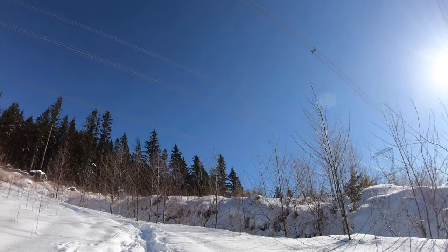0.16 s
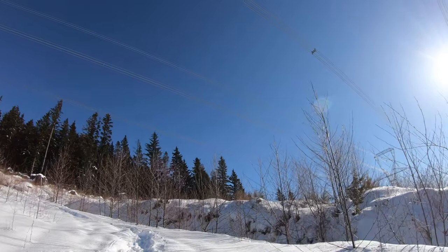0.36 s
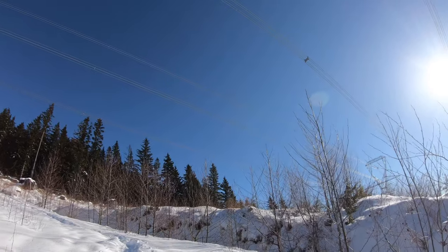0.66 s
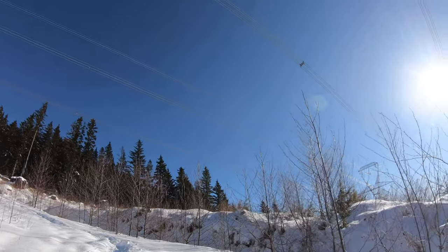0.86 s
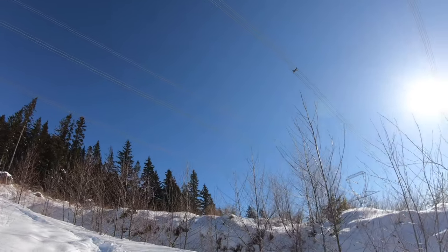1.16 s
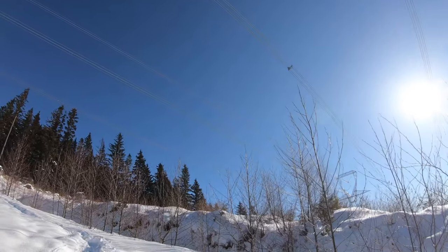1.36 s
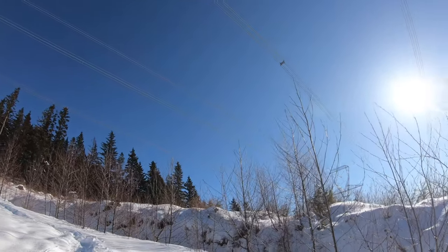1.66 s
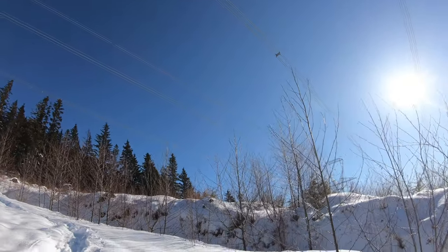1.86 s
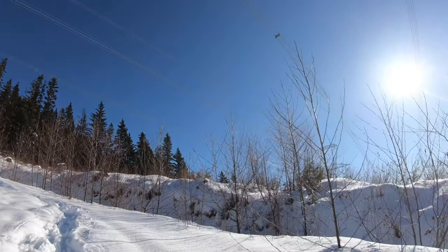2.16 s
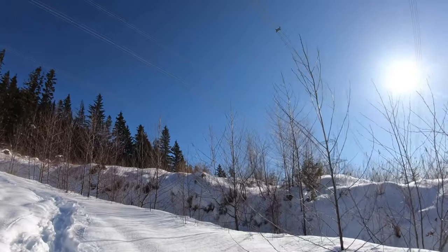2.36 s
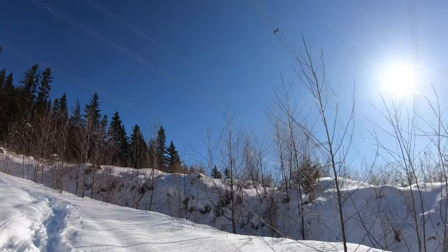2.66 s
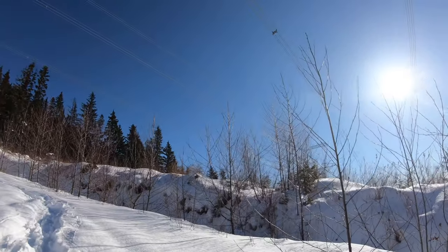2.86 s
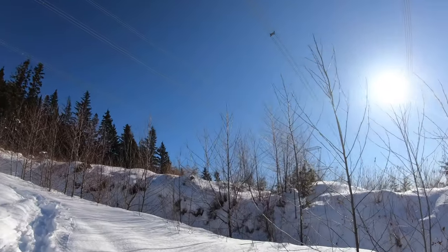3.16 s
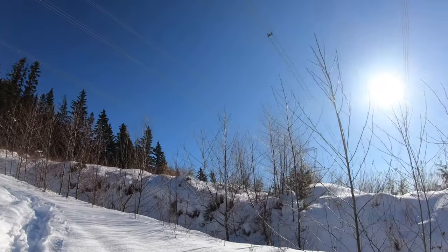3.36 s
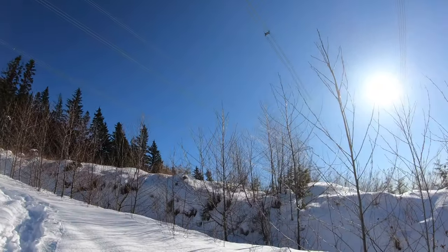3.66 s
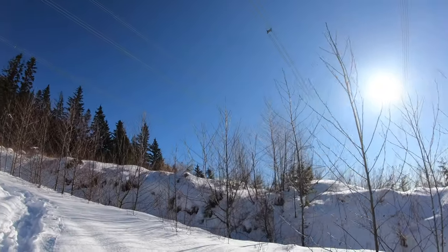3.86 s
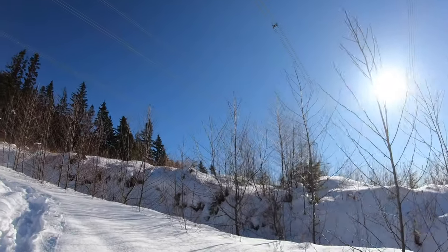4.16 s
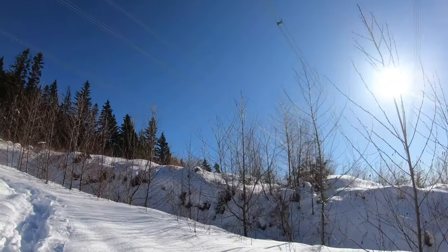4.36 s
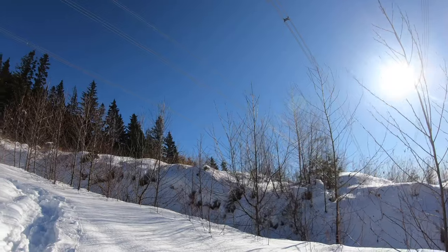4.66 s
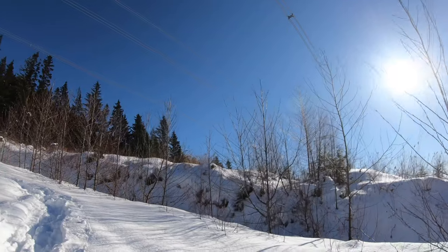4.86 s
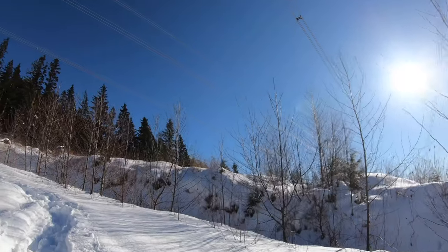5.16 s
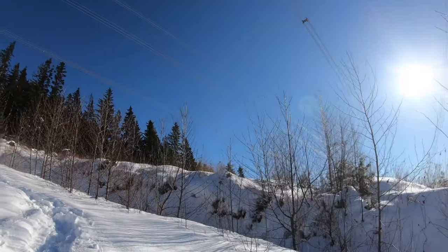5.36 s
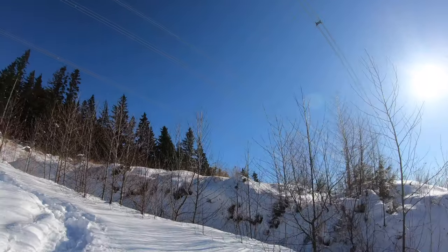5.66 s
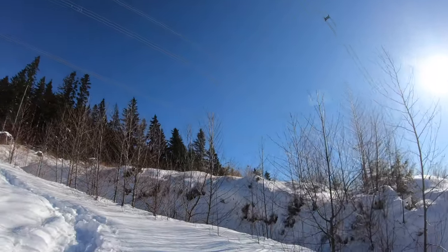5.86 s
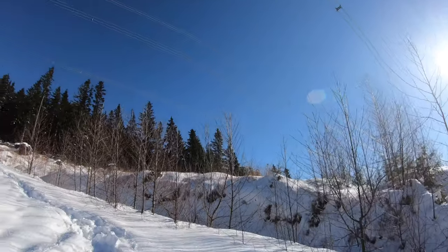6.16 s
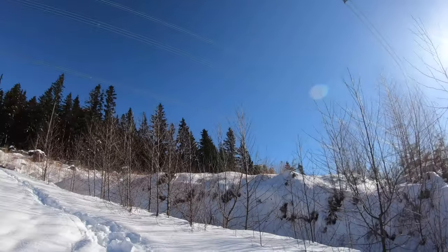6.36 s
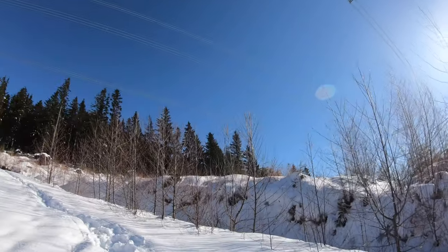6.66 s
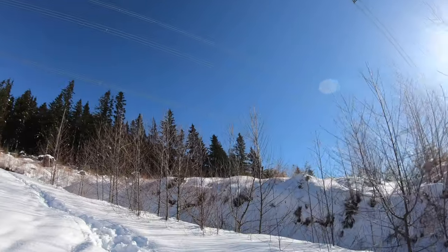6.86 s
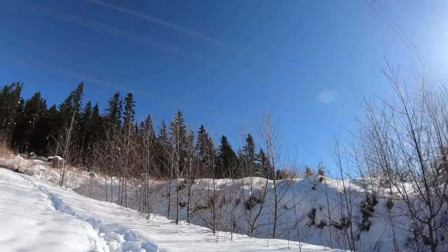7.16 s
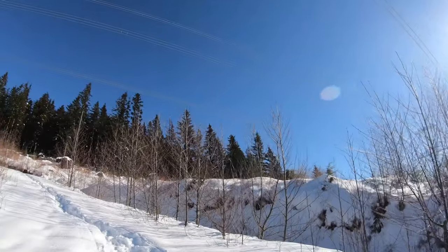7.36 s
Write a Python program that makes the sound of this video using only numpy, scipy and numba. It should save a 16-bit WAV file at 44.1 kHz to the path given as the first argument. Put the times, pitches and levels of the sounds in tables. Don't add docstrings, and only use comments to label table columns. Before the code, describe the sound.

Close walking footsteps break snow crust with crisp crackling and icy ticks, over faint airy hiss and occasional low wind buffets.

```python
import sys
import numpy as np
from scipy import signal
from scipy.fft import rfft, irfft, next_fast_len
from scipy.io import wavfile
from scipy.ndimage import uniform_filter1d, minimum_filter1d, map_coordinates
from numba import njit

SR = 44100
rng = np.random.default_rng(int(sys.argv[2]) if len(sys.argv) > 2 else 0)


def wav_record(signal):
    frames = np.transpose(np.atleast_2d(signal))
    bounded = np.clip(frames, -1, 1)
    quanta = np.round(bounded * 32767).astype(np.int16)
    wavfile.write(sys.argv[1], SR, quanta)


def volts(x):
    e = np.asarray(x, float) / 20
    return 10 ** e


N = 331796
SIZE = next_fast_len(N + 4096)
HZ = np.fft.rfftfreq(SIZE, 1 / SR)
T = np.arange(N) / SR


def evened(x):
    return x / np.sqrt(np.mean(np.abs(x) ** 2) + 1e-20)


def smooth_noise(shape, width):
    noise = rng.standard_normal(shape)
    return evened(uniform_filter1d(uniform_filter1d(noise, size=width), size=width))


def read(points, hz, order=1):
    rows = np.transpose(points)
    return np.interp(np.log(hz + 1), np.log(rows[0] + 1), rows[order])


def band(low_hz, high_hz):
    return np.sqrt(1 / (1 + (low_hz / (HZ + 1)) ** 6) / (1 + (HZ / high_hz) ** 6))


def ring(hz, cycles):
    turns = np.arange(round(3 * cycles * SR / hz) + 2) * hz / SR
    decay = np.exp(-2.3 * turns / cycles)
    onset = 1 - np.exp(-(turns / 0.61) ** 2)
    return np.sin(2 * np.pi * turns) * decay * onset


@njit
def add(mix, starts, sizes, hzs, cycles, rate):
    for start, size, hz in zip(starts, sizes, hzs):
        step, swing = np.exp((2j * np.pi - 2.3 / cycles) * hz / rate), size + 0j
        for n in range(start, min(start + int(2.5 * cycles * rate / hz), len(mix))):
            mix[n] += swing.imag
            swing *= step


def underfoot():
    # start_s, deep_db, fine_db, deep_hollow_hz, crust_hollow_hz
    ground = [(0.0, -6, -8, 238, 1460), (0.187, -7, -5, 212, 1600), (.58, -1.5, 0, 190, 1760),
              (0.649, -3, -10.5, 252, 1480), (.86, -5, -6, 443, 1710), (1.141, -5, -5, 445, 2650),
              (1.3, -4, -6, 440, 2000), (1.55, -2.5, -2, 362, 2430), (1.89, -1, -3, 403, 2200),
              (2.269, -3, -4, 215, 900), (2.62, -4.5, -3, 533, 2220), (2.83, -5.5, -6.5, 530, 1120),
              (3.02, -1.8, -11, 392, 1350), (3.23, -5.5, -10, 340, 700), (3.66, -3, -6.5, 654, 720),
              (4.04, 1.2, -9.5, 163, 1190), (4.19, -2, -5.5, 640, 1420), (4.33, -7, -4, 297, 2940),
              (4.53, -5, -7, 620, 666), (4.84, -3.5, -10, 189, 1910), (4.97, -1.5, -10.5, 320, 2130),
              (5.14, -3, -12, 316, 1250), (5.5, -4, -5.5, 164, 1290), (6.03, -5.5, -11, 278, 1390),
              (6.5, -2.5, -4, 168, 3600), (6.53, -13, -8.5, 170, 910), (6.57, -1.5, -5, 586, 1580),
              (6.635, -5, -3, 170, 1400), (6.72, -3.5, -4, 290, 1680), (6.83, -6, -3.5, 172, 1800),
              (7.109, -1, -5.5, 302, 1770), (7.26, -10, -16, 400, 1770)]
    start_s, *snow = np.transpose(ground)
    footing = np.searchsorted(start_s, T, side="right") - 1
    return np.array(snow)[:, np.clip(footing, 0, None)]


def loads():
    # start_s, length_s, top_db
    builds = [(0.177, 0.026, -23), (0.21, 0.017, -18.5), (0.335, 0.027, -22), (0.419, 0.02, -29),
              (0.804, 0.015, -28), (0.853, 0.012, -27), (0.945, 0.052, -14.5), (1.595, 0.019, -42),
              (1.9, 0.058, -19.5), (1.918, 0.057, -18), (2.377, 0.058, -35), (2.639, 0.014, -29.5),
              (2.701, 0.042, -19.5), (3.021, 0.07, -17), (3.082, 0.034, -18.5), (3.142, 0.0091, -22),
              (3.665, 0.058, -37.5), (3.72, 0.12, -30), (3.883, 0.032, -28.5), (3.931, 0.04, -25),
              (4.528, 0.025, -34.5), (4.602, 0.011, -27), (4.715, 0.02, -29.5), (5.562, 0.038, -31),
              (5.598, 0.036, -28.5), (6.739, 0.043, -20.5), (4.332, 0.017, -35), (3.31, 0.006, -44),
              (3.538, 0.028, -37), (5.17, 0.033, -30), (6.72, 0.0048, -32), (6.831, 0.13, -24)]
    # start_s, length_s, load_db, change_db over the run
    crushes = [(0.0, 0.04, -17.5, -6), (0.033, 0.044, -19.5, 4.5), (0.086, 0.021, -20, 0),
               (0.124, 0.06, -20, -1), (0.082, 0.05, -25.5, 1.5), (0.234, 0.03, -21.5, -14.5),
               (.704, 0.035, -25, -9.5), (0.873, 0.013, -21, -3), (0.886, 0.04, -33, 5),
               (1, 0.11, -19.5, -0.5), (1.143, 0.06, -21.5, -1), (1.209, 0.049, -16, -10),
               (1.611, 0.15, -24, -1.5), (1.77, 0.12, -28, -2), (1.975, 0.11, -27, 0),
               (2.056, 0.24, -22, -16.5), (2.277, .11, -24.5, -9.5), (2.859, .16, -19.5, 0),
               (0.591, 0.035, -29, -8), (3.159, 0.054, -18, -10), (3.567, 0.049, -25.5, -5.5),
               (3.821, 0.066, -28.5, 1), (3.923, 0.018, -24.5, -10.5), (3.971, 0.062, -29.5, -2.5),
               (4.04, 0.11, -24.5, -6), (4.61, 0.038, -23.5, -14.5), (4.848, 0.045, -23, -5),
               (4.887, 0.079, -18.5, -11), (4.975, 0.13, -26, -1.5), (5.152, 0.053, -24, -3.5),
               (5.641, 0.12, -34.5, 1.5), (5.766, 0.055, -26.5, 4.5), (5.83, 0.19, -27, -2.5),
               (6.026, 0.16, -26.5, -7), (6.963, 0.15, -25.5, -5.5), (7.105, 0.14, -34.5, -5.5)]
    # start_s, length_s, load_db
    crackles = [(0.397, 0.022, -27), (0.441, 0.023, -32.5), (0.5, 0.044, -33), (0.513, 0.0075, -25),
                (0.664, 0.021, -32), (0.74, 0.022, -27), (1.361, 0.042, -37.5), (1.396, 0.011, -30.5),
                (1.445, 0.024, -39.5), (1.557, 0.0077, -44), (1.583, 0.0081, -27.5), (2.653, 0.05, -20),
                (2.695, 0.015, -22.5), (2.75, 0.037, -21), (2.801, 0.05, -26.5), (2.837, 0.019, -18.5),
                (3.393, 0.008, -32.5), (3.52, 0.032, -30), (4.2, 0.21, -36), (4.26, 0.14, -29.5),
                (4.4, 0.12, -38.5), (4.565, 0.059, -44), (4.693, 0.02, -30), (4.782, 0.074, -33.5),
                (5.512, 0.047, -36), (6.201, 0.07, -29), (6.261, 0.033, -35), (6.507, 0.17, -36.5),
                (6.572, 0.06, -29), (6.637, 0.021, -29), (6.644, 0.058, -36.5), (6.668, 0.023, -35.5),
                (6.698, 0.03, -38), (6.791, 0.08, -21)]
    # start_s, length_s, load_db
    trickles = [(0.271, 0.096, -31.5), (.366, .06, -41.5), (0.65, 0.11, -43), (0.767, .09, -55),
                (1.412, 0.16, -59), (0.452, 0.35, -48.5), (0.936, 0.022, -43), (1.11, 0.034, -34),
                (1.252, 0.16, -43), (2.437, 0.47, -48), (3.12, 0.037, -40.5), (3.233, 0.091, -45),
                (3.332, 0.87, -50.5), (3.607, 0.22, -50.5), (4.146, 0.11, -37.5), (4.506, 0.08, -44.5),
                (4.645, 0.13, -46), (5.11, 0.052, -42.5), (5.199, 0.073, -46), (5.27, 0.48, -55),
                (6.195, 0.038, -40), (6.282, 0.67, -57.5), (6.601, .09, -44), (6.691, 0.084, -41.5),
                (7.244, 0.28, -51)]
    build_db, crackle_db, trickle_db = 14, -23, -4
    tails_s = np.array([0.0047, 0.00078, 0.0023, 0.00066])
    fine_per_db, stutter_db = -0.0073, 1
    release_db_per_s = 2500

    rows = [(s, length, top_db - build_db, build_db) for s, length, top_db in builds]
    rows += crushes
    rows += [(*row, crackle_db) for row in crackles]
    rows += [(*row, trickle_db) for row in trickles]
    load_db = np.full(N, -70.)
    for s, length, db, change_db in rows:
        at = slice(max(round(s * SR), 0), round((s + length) * SR))
        load_db[at] = np.maximum(load_db[at], db + change_db * (T[at] - s) / length)

    load_db = minimum_filter1d(-minimum_filter1d(-load_db, size=350), size=350)
    fall_db = release_db_per_s * T
    load_db = np.maximum.accumulate(load_db + fall_db) - fall_db
    load_db += stutter_db * smooth_noise(N, 300)

    deep_db, fine_db = underfoot()[:2]
    fine_db = fine_db + fine_per_db * (load_db + 112)
    levels = volts(load_db + np.array([deep_db, 0 * T - .6, fine_db, fine_db / 2 - 18.0]))
    keeps = np.exp(-1 / (tails_s * SR))
    return [signal.lfilter([1 - keep], [1, -keep], level) for keep, level in zip(keeps, levels)]


def fractures(level, hollow, low_hz, high_hz, cycles, per_s, spread_db, patchy_db, boost_db):
    busy = np.clip(level / level.max() * 6, .02, 1) ** .3
    draw = rng.random((5, N))
    at = np.flatnonzero(draw[0] < busy * per_s / SR)
    size = volts(spread_db * np.minimum(-np.log(draw[1, at] + 1e-9), 5))
    size = evened(size) * (level / np.sqrt(busy * per_s / SR))[at]
    patches = rng.standard_normal((N // 1300 + 2, 8))
    out = np.zeros((2, SIZE))
    for path, place in zip(out, draw[2:4, at]):
        hz = low_hz * (high_hz / low_hz) ** place
        near = np.exp(-np.log(hz / hollow[at]) ** 2 / 0.044)
        patch = map_coordinates(patches, [at / 1300, 7 * place], order=1)
        colour = evened(volts(patchy_db * patch + boost_db * near))
        sign = np.sign(draw[4, at] - place + 1e-9)
        add(path, at, sign * size * colour * np.sqrt(hz), hz, cycles, SR)

    bank = np.zeros((16, 8192))
    for row, hz in zip(bank, np.geomspace(low_hz, high_hz, num=16)):
        add(row, np.array([0]), np.sqrt([hz]), np.array([hz]), cycles, SR)
    bank_power = np.mean(abs(rfft(bank)) ** 2, axis=0)
    power = np.interp(HZ, np.fft.rfftfreq(8192, 1 / SR), bank_power)
    return rfft(out) / np.sqrt(power + 0.0057 * power.max())


def crunch():
    # low_hz, high_hz, cycles, breaks_per_s, size_spread_db, patchiness_db, hollow_boost_db
    grains = [
        (130, 646, 5.5, 450, 2.5, 0.5, 4.5),
        (620, 4060, 8.1, 2600, 0, 1.5, 2),
        (3734, 16900, 7.3, 9000, -1, 3, 7),
        (1600, 2760, 3.9, 140, -1.5, -4, 13),
    ]
    # pitch_hz, level_db per Hz
    one_port = [(59, -33), (100, -0.5), (188, 6), (333, 0), (420, 1), (589, 0.5), (844, -6), (1060, -5),
                (2140, -4.5), (3400, -14), (4300, -26.5), (6970, -37.5), (8260, -33.5), (9570, -45),
                (13400, -50.5), (15600, -65)]
    # pitch_hz, level_db per Hz
    two_ports = [(59, -17), (100, 1), (378, -4), (577, -7), (713, -5.5), (776, -8.5), (1110, -8),
                 (2330, -9.5), (3400, -17.5), (4030, -26), (7430, -22.5), (13400, -43), (15600, -57)]
    one_colour, two_colour = volts(read(one_port, HZ)), volts(read(two_ports, HZ))
    deep_hz, crust_hz = underfoot()[2:]
    one, two = 0, 0
    for level, hollow, grain in zip(loads(), (deep_hz, crust_hz, crust_hz, crust_hz), grains):
        breaks, edges = fractures(level, hollow, *grain), band(*grain[:2])
        one = one + breaks * evened(edges * one_colour)
        two = two + breaks * evened(edges * two_colour)
    return one, two


def snaps():
    # peak_s, peak_db, pitch_hz
    plates = [(0.253, -22, 1500), (0.523, -23, 1220), (1.735, -27, 910), (1.852, -17, 1800),
              (2.927, -19, 1500), (2.932, -8, 1200), (2.967, -12, 900), (3.572, -14, 670),
              (4.975, -10.5, 935), (5.022, -13, 900), (5.775, -16, 1080), (6.773, -14, 790)]
    # peak_s, peak_db, pitch_hz
    thuds = [(0.1481, -20, 313), (0.2413, -18.5, 348), (0.6662, -28, 362), (0.7093, -18, 390),
             (0.7447, -27, 312), (0.8821, -17, 430), (0.9864, -14.5, 514), (1.0948, -9.5, 424),
             (1.1175, -12, 462), (1.18, -6, 433), (1.2317, -17, 373), (1.6172, -25, 310), (1.6732, -9, 393),
             (1.734, -12.5, 340), (1.8531, -25, 307), (1.9551, -25, 380), (1.976, -19.9, 308),
             (2.058, -17, 436), (2.1735, -17, 300), (2.2844, -22, 272), (2.3286, -16, 421),
             (2.7556, -21, 370), (2.8442, -16, 296), (2.9184, -20, 312), (2.9667, -12.5, 324),
             (3.0141, -12, 410), (3.0798, -16, 345), (3.1703, -13, 430), (3.5744, -20.5, 346),
             (3.9238, -27.5, 380), (3.9707, -26, 452.5), (4.0905, -26, 300), (4.61, -18, 590),
             (4.9773, -21, 310), (5.0873, -16, 314), (5.1698, -23, 371), (5.5181, -20, 620),
             (5.8816, -23, 306), (6.0925, -22, 586), (6.1304, -19, 485), (6.266, -30, 303),
             (6.7741, -21, 348), (7.0322, -24, 313)]
    # peak_s, peak_db, pitch_hz
    cracks = [(0.1222, -8, 1340), (0.1404, -9, 1550), (0.1832, -16, 1104), (0.2417, -10.5, 1300),
              (0.2533, -16.5, 1470), (0.3642, -14, 2078), (0.3993, -17, 2400), (0.5154, -21, 1394),
              (0.5236, -18.5, 1384), (0.5971, -34, 1712), (0.6642, -23.5, 2010), (0.7082, -10.5, 1120),
              (0.7388, -16.5, 1100), (0.7896, -33, 1308), (0.8118, -22, 2160), (0.8166, -8.5, 1346),
              (0.876, -9, 1220), (0.8862, -15, 2170), (0.9293, -17, 2105), (1.107, -22, 1787),
              (1.2565, -14, 1513), (1.3639, -31, 2686), (1.3984, -28, 990), (1.4506, -26.5, 1010),
              (1.477, -35, 1300), (1.5583, -32, 2132), (1.5889, -24, 1427), (1.62, -8, 2590),
              (1.6898, -10, 1740), (1.8429, -10.5, 2240), (1.8864, -17.5, 2433), (2.3245, -18, 964),
              (2.6567, -10.5, 2900), (2.7009, -15, 2080), (2.7474, -13, 1230), (2.8399, -18.5, 1140),
              (3.193, -6.5, 1490), (3.3136, -29, 2050), (3.3959, -26, 2540), (3.5245, -20, 2067),
              (3.5297, -24.5, 2223), (3.5753, -29, 2514), (3.6057, -19.5, 1087), (4.056, -16, 2160),
              (4.2082, -27, 1420), (4.5531, -21.5, 1420), (4.6973, -26, 1303), (5.0125, -17.5, 1130),
              (5.041, -14, 2130), (5.2029, -13, 1250), (5.5156, -30, 920), (5.5982, -20.5, 2200),
              (5.8651, -15.5, 1153), (6.1279, -15.5, 1060), (6.1807, -20, 1360), (6.2079, -21.5, 1082),
              (6.2642, -28, 1163), (6.2687, -29.5, 1281), (6.7279, -19, 1490), (7.024, -14.5, 1190)]
    # peak_s, peak_db, pitch_hz
    ticks = [(0.0488, -17, 3871), (0.1553, -27.0, 3903), (0.5993, -13.5, 5100), (0.624, -19.5, 4350),
             (0.5555, -32, 2300), (0.9837, -26, 3887), (1.0701, -12, 3970), (1.2163, -25, 3984),
             (1.2293, -13, 3919), (1.2435, -22, 4170), (1.5578, -42, 4097), (1.5887, -22.5, 4457),
             (1.6143, -24, 3828), (1.62, -12, 3930), (1.632, -19, 4075), (1.6889, -23.1, 4102),
             (1.7764, -14, 3800), (1.8526, -30, 3700), (1.8864, -24, 4032), (1.9503, -16, 3951),
             (1.9719, -20, 3946), (2.0769, -28, 3967), (2.2995, -26.7, 3984), (2.6569, -10, 4387),
             (2.7422, -6, 3880), (2.842, -24, 4070), (2.8814, -8, 3800), (2.8871, -13, 3924),
             (2.9211, -22, 3682), (2.9268, -8, 3930), (4.2073, -22, 7800), (4.2857, -29, 7300),
             (4.6045, -23, 3871), (4.6977, -24, 7160), (4.8497, -12, 7047), (4.9379, -30, 7300),
             (4.946, -15, 3833), (5.2068, -37, 7370), (5.5152, -19, 6255), (5.5791, -22, 7779),
             (5.8073, -21, 8576), (6.1637, -19, 4200), (6.5143, -22, 3850), (6.5644, -22, 4420),
             (6.5739, -35, 7590), (6.639, -7, 7240), (6.7565, -25, 6837), (6.9519, -24.0, 7262)]
    # peak_s, peak_db, pitch_hz
    slabs = [(0.35, -23, 2040), (4.886, -17, 1880), (5.04, -11, 2210), (6.67, -27, 1290), (6.79, -21, 1775),
             (2.93, -13, 1070)]
    # breaks, cycles, trim_db, lead_s from start to peak
    kinds = [(plates, 1.2, -2, 0.0003), (thuds, 10.5, -2.5, 0.0028), (cracks, 3.0, -1.5, 0.0009),
             (ticks, 9.0, -8, 0.0005), (slabs, 24, 0.1, 0.002)]
    out = np.zeros(SIZE)
    for rows, cycles, trim_db, lead_s in kinds:
        for (s, db, hz), (lower, side) in zip(rows, rng.random((len(rows), 2))):
            crack = ring(hz, cycles)
            partner = ring(hz * (1.3 - 0.59 * lower), 0.31 * cycles)
            crack[:len(partner)] += 1.5 * partner
            start = max(round((s - lead_s) * SR), 0)
            gain = np.sign(side - .5) * volts(db + trim_db)
            out[start:][:len(crack)] += gain * crack / crack.max()
    return rfft(out) * band(60, 13400) ** 2


def pair(near, other):
    # pitch_hz, likeness (0-1), right_lead_rad, left_minus_right_db
    ports = [(150, 1, 0.06, -0.5), (400, 0.92, 0.3, 0), (905, 0.6, 1.4, -10.5), (1300, 0.5, 2.2, -18),
             (2800, 0.3, 1.9, -13), (4100, 0.45, 3.3, -3), (7400, 0.7, 3.7, -8.5), (10000, 0.45, 5.6, -4),
             (13500, 0.4, 6.5, -1.5), (15000, 0.3, 9.2, -2)]
    same = np.clip(read(ports, HZ), 0, 1)
    lead = same * np.exp(1j * read(ports, HZ, order=2))
    left = volts(read(ports, HZ, order=3))
    apart = np.sqrt(1 - same ** 2)
    mean = np.sqrt(abs(left + lead) ** 2 + 1 - same ** 2) / 2
    return np.array([left * (near * lead.conj() + other * apart), near]) / mean


def buffet():
    # time_s, left_db, right_db
    gusts = [(0.0, -55, -45), (.48, -31, -33.5), (.78, -52, -52), (1.0, -45, -37), (1.4, -49.5, -55),
             (2.32, -38, -41.5), (2.52, -56.5, -58), (2.74, -29, -29), (3.52, -46.5, -29.5),
             (4.2, -34.5, -36), (4.481, -60, -54), (4.66, -44, -36), (5.2, -26.5, -44), (5.42, -49, -41),
             (5.75, -26.5, -25.5), (6.46, -42.5, -40), (7.041, -23, -21.5), (7.33, -67, -67)]
    # pitch_hz, level_db per Hz
    gust_colour = [(12, -48), (20, 3), (70, 3.5), (136, -1), (259, -7.5), (300, -3), (390, -52),
                   (660, -120)]
    # start_s, peak_db, pitch_hz, left_minus_right_db
    jolts = [(0.477, -17.5, 117, 3), (.985, -24, 85.5, 1), (1.468, -27.5, 170, 5), (1.927, -16, 83, -6),
             (2.303, -11, 130, -5.5), (2.762, -21, 150, 9.5), (3.105, -18, 68, 0), (5.019, -8.5, 142, 1),
             (5.212, -18, 72, 14), (5.229, -19, 67, 12), (5.625, -20.5, 90, 23), (5.691, -21, 70.5, 23),
             (5.707, -14.5, 101.6, 16), (5.831, -10, 85, 1), (6.088, -14, 93, 4.5), (6.764, -23, 60.4, 17),
             (6.973, -12, 80, 5), (7.032, -5.5, 74.4, 1), (6.24, -21, 74.5, 12), (7.201, -32, 230, -2),
             (7.26, -33, 90, 0), (4.17, -26, 190, 0), (5.475, -33.5, 110, 2)]
    gust_s, *gust_db = np.transpose(gusts)
    spectrum = rfft(rng.standard_normal((3, SIZE))) * volts(read(gust_colour, HZ)) * band(25, 150)
    noise = irfft(spectrum, SIZE)[:, :N]
    lumps = smooth_noise((2, N), 1800)
    ports = evened((noise[:2] + 0.92 * noise[2]) * volts(3.2 * lumps))
    ports *= volts(np.array([np.interp(T, gust_s, port_db) for port_db in gust_db]) - 2.5)
    for (s, db, hz, pan_db), shift in zip(jolts, rng.uniform(1.0, 1.06, len(jolts))):
        pushes = ring(hz, 0.57), ring(hz * shift, 0.76)
        for port, push, side_db in zip(ports, pushes, (pan_db, -pan_db)):
            part = port[round(s * SR):][:len(push)]
            part += volts(db - 5.5 + side_db / 2) * push[:len(part)] / push.max()
    return ports


def still_air():
    # pitch_hz, level_db per Hz
    hiss_colour = [(100, -39), (165, -4), (958, -17), (2580, -16.5), (5080, -22.5), (8430, -22.5),
                   (13100, -44), (15600, -65)]
    hiss = rfft(rng.standard_normal((2, SIZE))) * evened(volts(read(hiss_colour, HZ))) * volts(-53)
    swell = volts(2 * smooth_noise(SIZE, 2000))
    return rfft(irfft(hiss, SIZE) * swell)


def scene():
    fade_s = (2.77, 4.7)
    high_fade_s, high_hz = (3.04, 4.44), 4150
    cracks, hiss = snaps(), still_air()
    one_snow, two_snow = crunch()

    sheltered = hiss * band(12, 8950) * (1 - 1.3 * band(5360, 7560) ** 2)
    one = sheltered + [cracks, 0 * cracks] + one_snow
    two = hiss + [cracks, 0.5 * cracks] + two_snow

    air = buffet()
    main, leak = irfft([one[0], one[1] * band(15100, 20000) ** 3], SIZE)[:, :N]
    mono = main + air[0] + volts(14.0) * np.array([leak, -leak])
    stereo = irfft(pair(*two), SIZE)[:, :N] + air
    treble = irfft(rfft(stereo - mono, SIZE) * band(high_hz, SR) ** 2, SIZE)[:, :N]
    fade = np.interp(T, fade_s, [0, 1])
    high_fade = np.interp(T, high_fade_s, [0, 1])
    return (1 - fade) * mono + fade * stereo + (high_fade - fade) * treble


def top_cut(x):
    return signal.sosfilt(signal.butter(12, 15710, fs=SR, output="sos"), x)


def record(dry):
    limited = 0.85 * np.tanh(dry / 1.016)
    return top_cut(limited)


dry = scene()
out = record(dry)
wav_record(out)
```